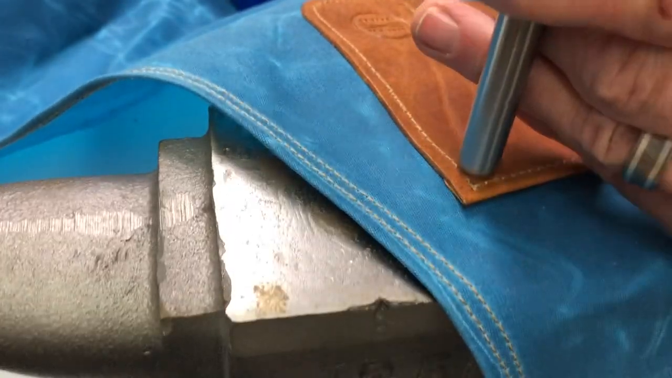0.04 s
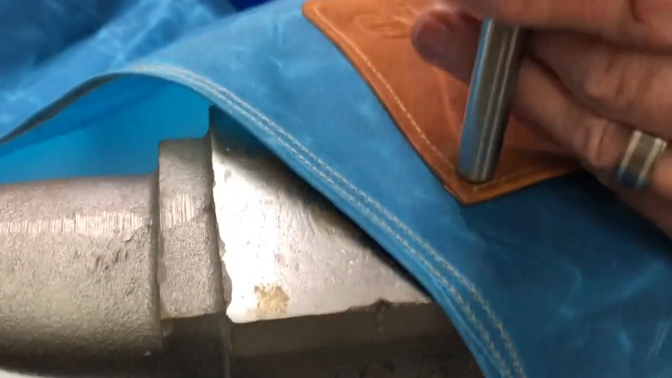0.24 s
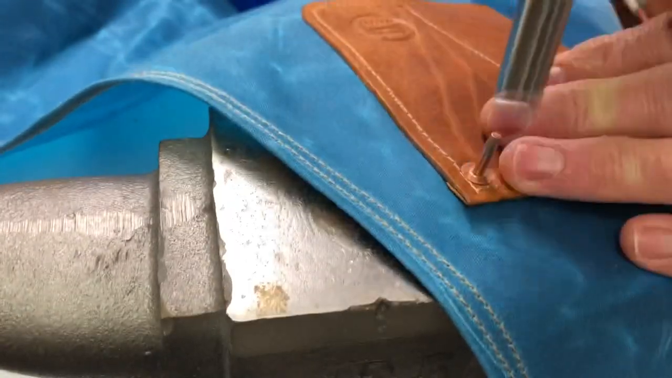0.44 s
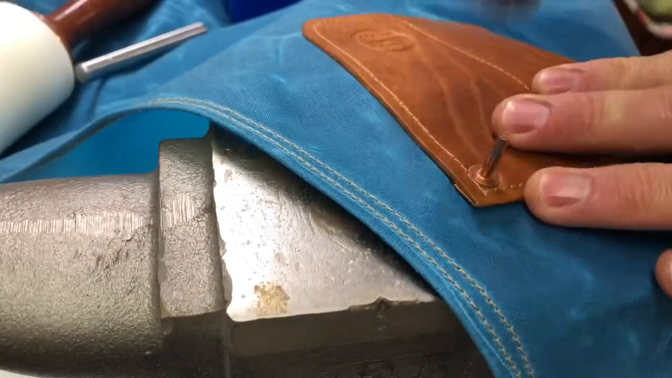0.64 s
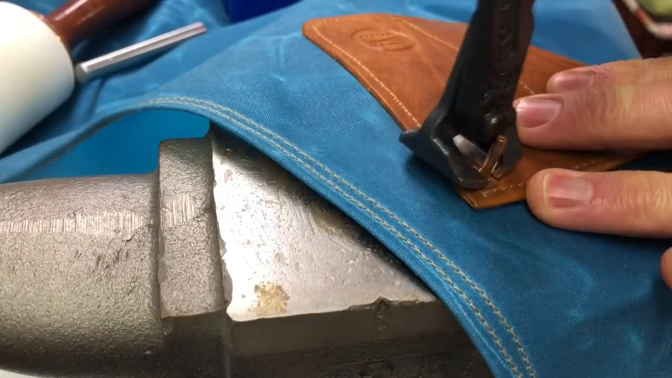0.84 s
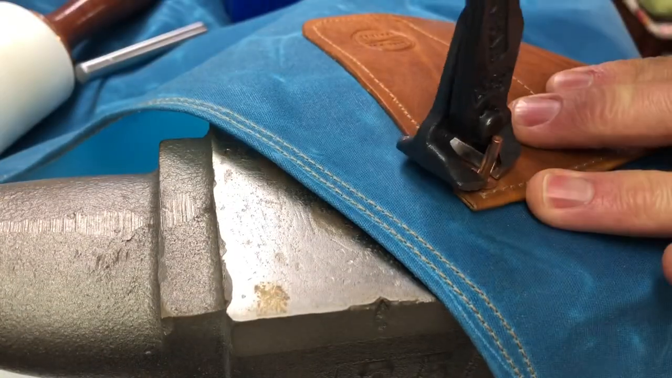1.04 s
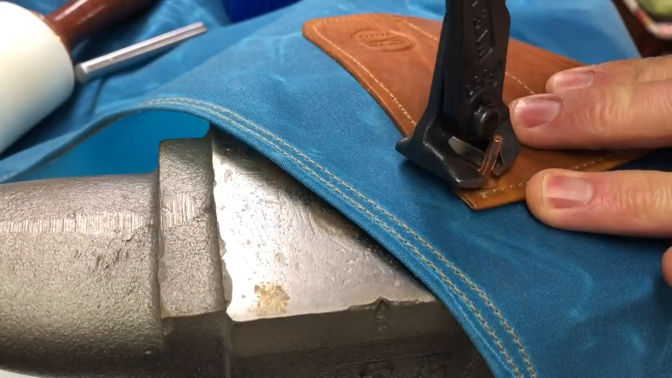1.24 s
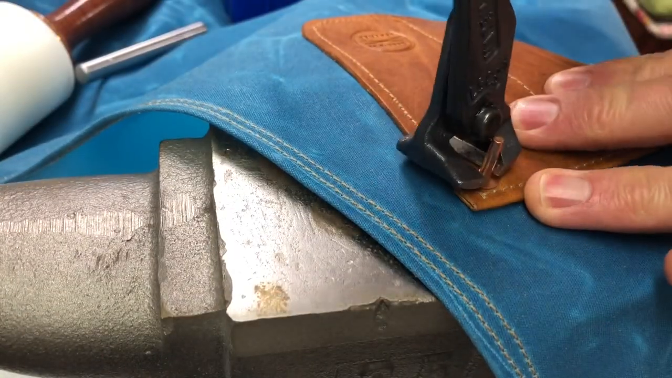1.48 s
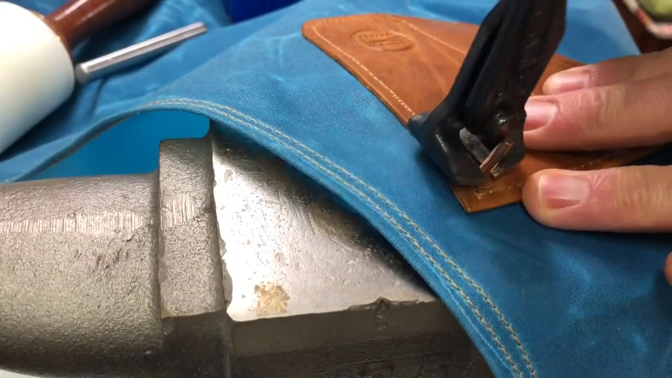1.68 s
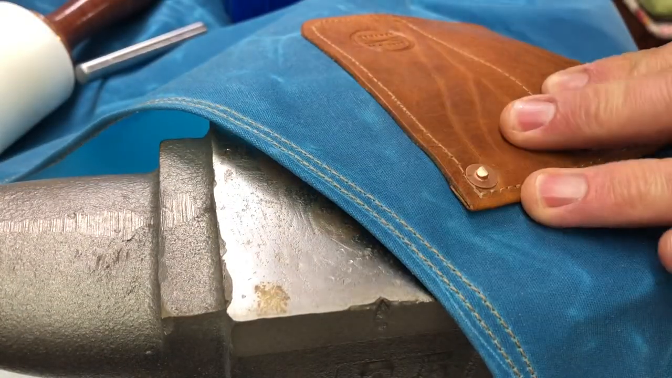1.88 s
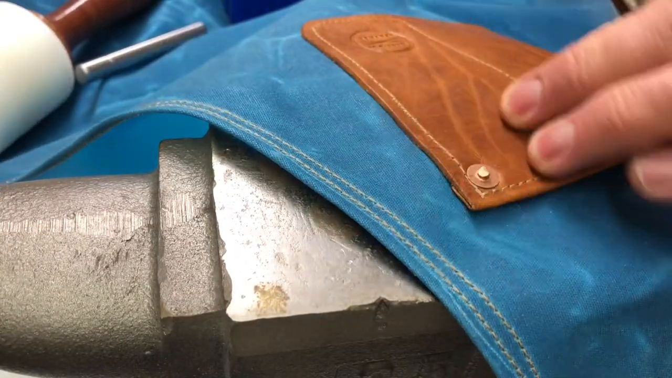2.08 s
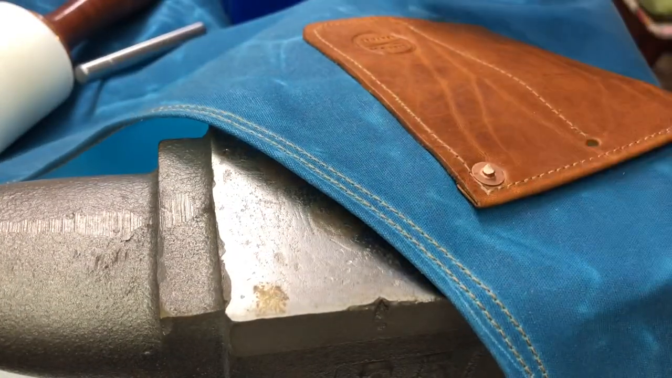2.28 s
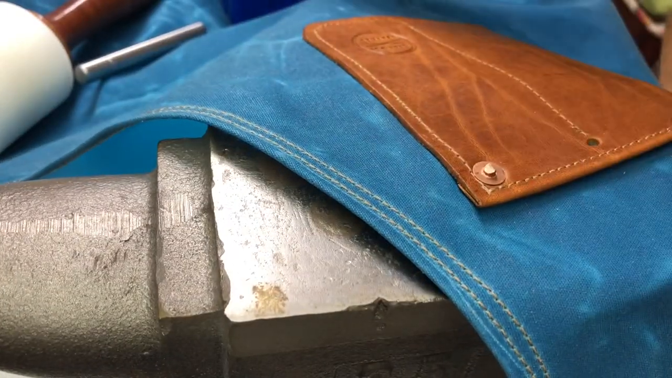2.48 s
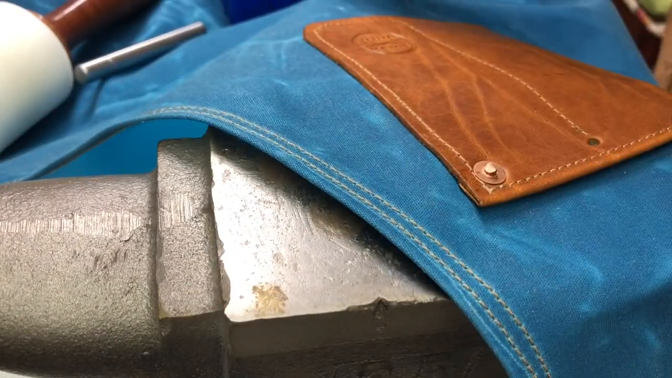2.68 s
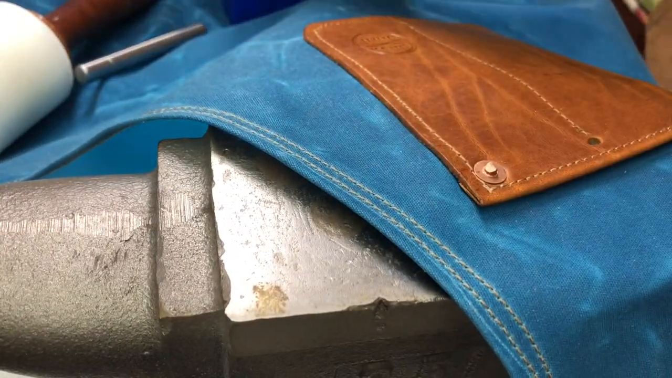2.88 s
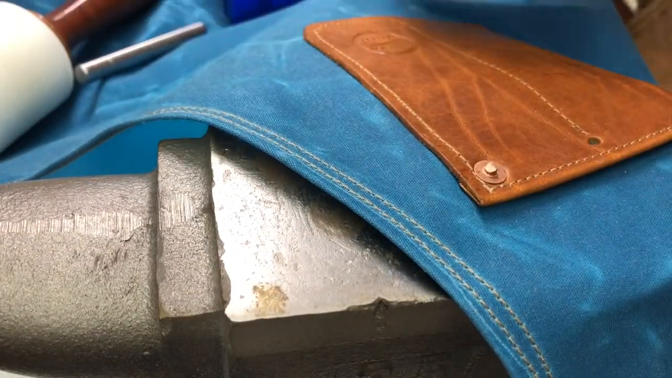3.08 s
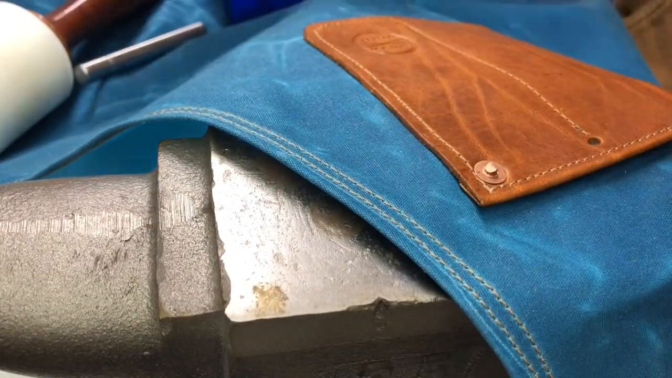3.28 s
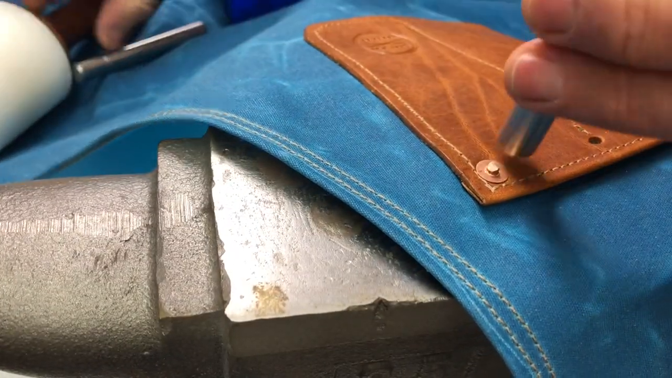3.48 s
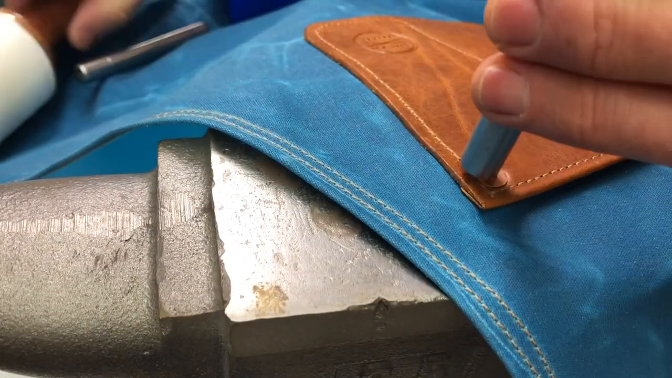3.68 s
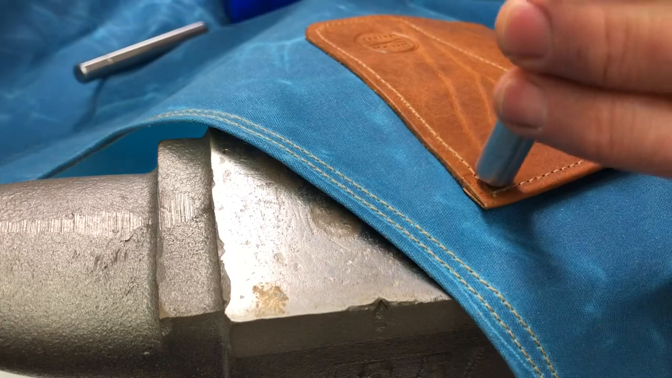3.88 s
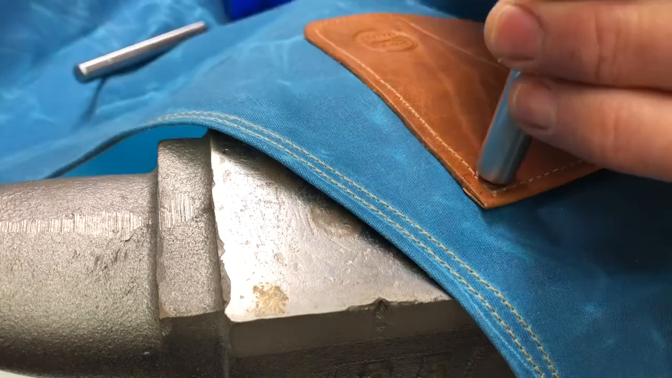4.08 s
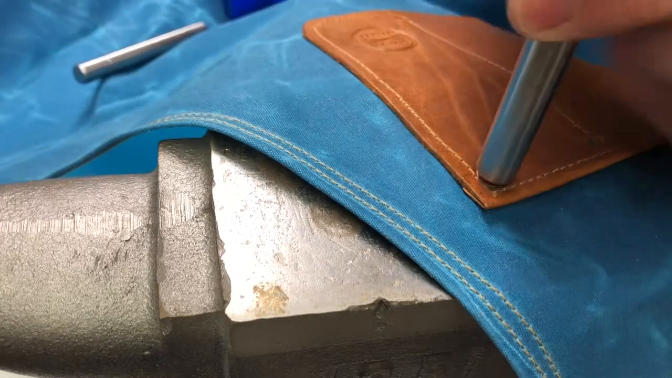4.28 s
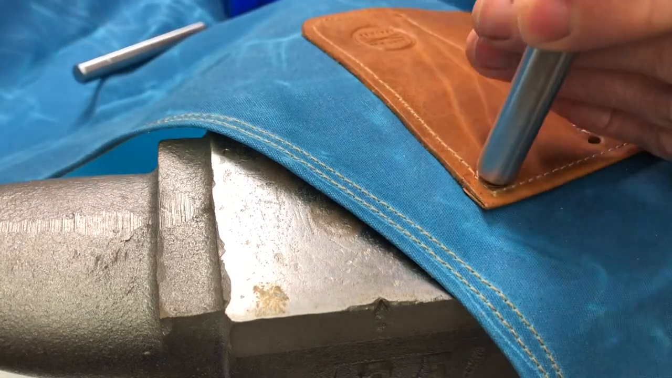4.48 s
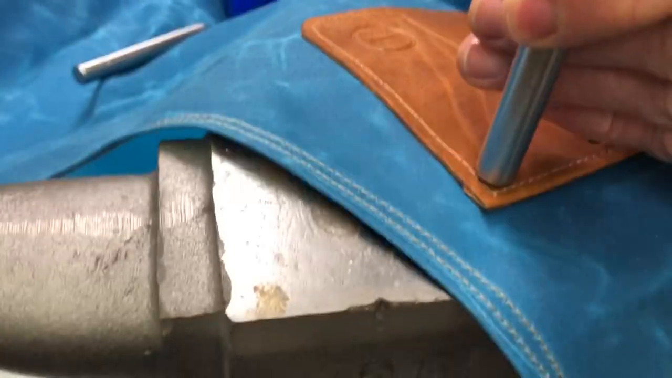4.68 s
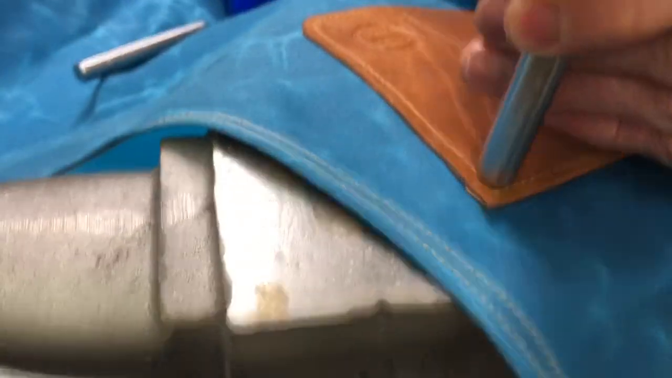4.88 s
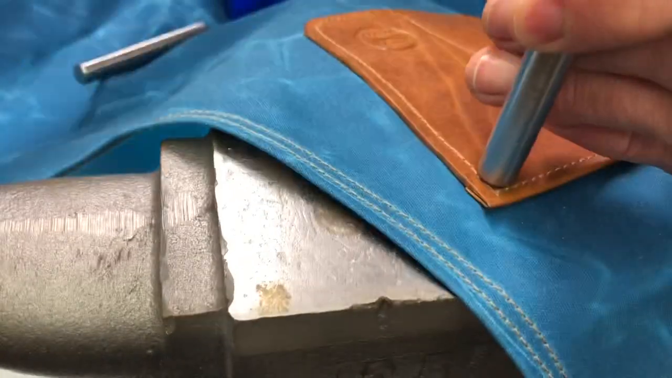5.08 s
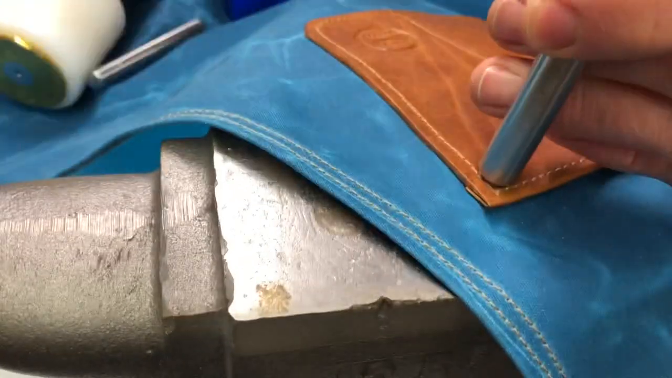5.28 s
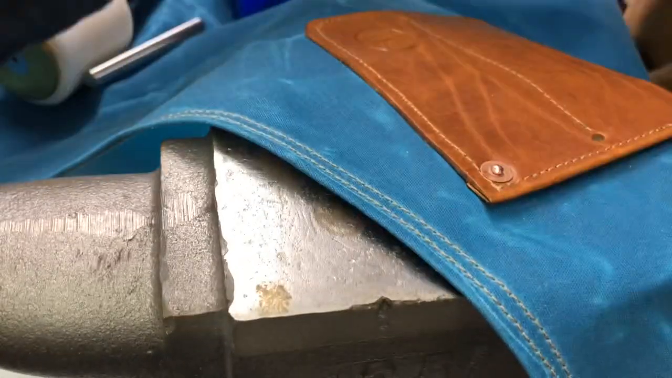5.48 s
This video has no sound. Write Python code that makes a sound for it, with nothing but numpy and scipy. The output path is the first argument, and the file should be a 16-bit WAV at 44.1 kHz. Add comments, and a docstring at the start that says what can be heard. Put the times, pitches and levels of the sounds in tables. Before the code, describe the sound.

Close workbench riveting: one metallic blow, light ticks and rustles, a dry snip, a leather scrape, then rapid mallet strikes ending in dull thuds.

```python
"""A workbench in fast motion: a mallet drives a steel setter on an anvil, tools tick, snip and are set down,
leather slides over canvas, fingers brush cloth, a motor hums far off. Noise bursts drive decaying modes for
each contact, filtered noise makes the rubs and air, wavering sines the motor. The speed-up keeps the pitch
but smears each blow into a burst that swells and fades; one edit dips to silence."""
import sys
import numpy as np
from scipy import signal
from scipy.fft import rfft, irfft
from scipy.io import wavfile
from scipy.ndimage import uniform_filter1d

SR = 44100
rng = np.random.default_rng(int(sys.argv[2]) if len(sys.argv) > 2 else 0)


def linear_from_db(decibels):
    """Turn decibels (scalar or array-like) into linear amplitude factors; 0 gives 1."""
    return 10 ** (np.asarray(decibels, float) / 20)


def unload_wav(signal):
    """Save mono or channel-first audio to the path in sys.argv[1] as 16-bit WAV at rate SR, clipped to [-1, 1]."""
    wavfile.write(
        sys.argv[1],
        SR,
        np.round(np.clip(np.atleast_2d(signal).T, -1, 1) * 32767).astype(np.int16),
    )


N = 244314
# time and frequency axes of one contact
SIZE = 32768
TIME, FREQ = np.arange(SIZE) / SR, np.fft.rfftfreq(SIZE, 1 / SR) + 1

# Spectrum of the room air. Each row: frequency in Hz, relative level in dB.
AIR_COLOUR = [(15, -46.5), (25, -12.5), (122, -4.5), (152, -9), (282, -5.5), (350, -10), (390, -10),
              (686, -14), (829, -12.5), (948, -13.5), (1350, -20), (1460, -18.5), (15600, -42)]
AIR_DB = -60.5
# Lines of the far motor. Each row: frequency in Hz, level in dB.
MOTOR_LINES = [(119, -82), (221, -74), (265, -72.5), (311, -69), (355, -67.5), (470, -77), (823, -77),
               (975, -83.5)]
# Decay of the room tail. Each row: band centre in Hz, t60 in seconds.
ROOM_DECAY = [(100, 0.19), (400, 0.27), (1500, 0.32), (5000, 0.14), (12000, 0.022)]
ROOM_DB = -19

# Light strokes of leather on canvas. Each row: start in seconds, hold in seconds, level in dB,
# hollow drag in dB re weave, sheen in dB re weave.
LEATHER_STROKES = [(.215, 0.073, -60, -6, -3.5), (0.354, 0.0067, -51, -4, -6), (.55, 0.17, -69.5, -1.5, -5),
                   (2.081, 0.074, -64, 6.5, -11.5), (2.242, 0.014, -52, 3, -15),
                   (2.293, 0.043, -68, 13.5, -7), (2.381, 0.045, -55, -1, -6.5),
                   (3.489, 0.037, -66.5, 10.5, -19.5), (3.609, 0.0087, -49, 0, -10.5),
                   (4.15, 0.1, -64, -2.5, -6), (5.35, 0.15, -59, 3, -8)]
STROKE_RISE_DB_PER_S, STROKE_FALL_DB_PER_S = 506.5, 303
# The long slide across the bench. Each row: time in seconds, level in dB, hollow drag in dB re weave.
LONG_SLIDE = [(2.47, -74, -2.5), (2.512, -47, 4), (2.556, -40.5, -7), (2.586, -41.5, -2),
              (2.606, -47, -1.5), (2.664, -38.5, 0.5), (2.704, -51, 2), (2.764, -75, -3), (2.8, -79, 0)]
# the sheen rises as the hollow drag falls
SLIDE_SHEEN_DB, SHEEN_PER_DRAG = -4, 0.4

# Fingers brushing cloth. Each row: time in seconds, smear in ms, level in dB.
CLOTH_BRUSHES = [(.231, 20, -53), (.305, 10, -47.5), (.535, 18, -60.5), (1.201, 7.3, -69),
                 (1.345, 17, -64.5), (1.391, 35, -65.5), (1.444, 19, -67)]
# Spectrum of the cutter on the rivet post. Each row: frequency in Hz, relative level in dB.
CUTTER_COLOUR = [(35, -55), (60, -13), (190, 0), (336, -13), (530, 0), (979, -17), (1100, -24), (1290, -13),
                 (1600, -17.5), (2320, -9), (3860, -19.5), (4870, -14), (5740, -21.5), (9140, -25),
                 (15600, -25)]
SNIP_S, SNIP_SMEAR_MS, SNIP_DB = 1.675, 4.5, -30
SNIP_TO_ROOM_DB = -12

# Tools ticking against the work. Each row: time in seconds, smear in ms, snap in dB, snap centre in Hz,
# thud in dB, fizz in dB.
TOOL_TICKS = [(.371, 4.2, -47, 3220, -51, -51), (.703, 8.8, -44.5, 3500, -62, -59.5),
              (.78, 7.5, -42, 3080, -51, -39), (.869, 5.3, -67, 3830, -65, -81),
              (2.431, 4.5, -48.5, 3660, -48, -73.5), (3.416, 8.1, -36, 4770, -50, -74),
              (3.544, 10.4, -47, 2660, -50.5, -67), (3.785, 20, -50, 2960, -55.5, -74)]
TICK_THUD_HZ = 454
# Tools and hands set down on the bench. Each row: time in seconds, smear in ms, thud in dB,
# thud centre in Hz, clatter in dB, fizz in dB.
SET_DOWNS = [(2.056, 5.6, -25.5, 276, -49, -48), (2.341, 12, -44, 346, -54.5, -77),
             (3.292, 55, -53, 190, -65, -66), (3.62, 13, -44.5, 197, -77, -58),
             (5.158, 30, -15, 348, -33, -34.5), (5.264, 20, -20, 310, -31.5, -26.5),
             (5.482, 27, -34.5, 550, -46.5, -64)]
CLATTER_HZ = 1530
# What a thump leaves ringing on the bench. Each row: frequency in Hz, relative level in dB, t60 in seconds.
CLUTTER_MODES = [(1085, 0, .1), (1184, -4, .05), (1317, -5, .04)]
CLUTTER_RE_CLATTER_DB = -4.5
# Setter rod ringing near 5.2 kHz, when handled or under a mallet blow. Each row: time in seconds,
# smear in ms, level in dB, tilt in dB per octave away from 5200 Hz, either way.
SETTER_ROD_RINGS = [(3.412, 1.9, -25.5, -1), (4.66, 43, -35.5, -13), (4.824, 8.9, -33, 1.5),
                    (5.127, 10.8, -44, -24)]
# Modes of the setter rod. Each row: frequency in Hz, relative level in dB, t60 in seconds.
SETTER_ROD_MODES = [(2013, -13, .05), (2090, -16, .025), (4560, -8, .045), (5080, -12, .025),
                    (5222, 0, .06), (8253, -30, .1), (10430, -16, .02), (13530, -9, .065)]
# The setter seated on the rivet. Each row: time in seconds, smear in ms, thud in dB, snap in dB, anvil in dB.
SETTER_SEATS = [(3.889, 10.6, -41, -43, -54), (4.083, 8.7, -33, -31, -39)]

# Mallet on setter. Each row: time in seconds, smear in ms, bench thud in dB, snap in dB,
# steel ring in dB, snap brightness in dB per octave.
MALLET_BLOWS = [(0.048, 16, -20.5, -25.5, -33.5, 4), (4.48, 7.3, -17.5, -22.5, -24, 1.5),
                (4.662, 23, -18.5, -28, -46.5, 0), (4.836, 14, -15.5, -25, -31, 0)]
# Spectrum of the mallet's snap. Each row: frequency in Hz, relative level in dB.
SNAP_COLOUR = [(290, -14), (500, 5.5), (603, -8), (915, -6.5), (2810, -13), (3540, -17.5), (5950, -16),
               (10300, -16), (12000, -25), (14500, -20), (15600, -21.5)]
# Modes of the bench. Each row: frequency in Hz, relative level in dB, t60 in seconds.
BENCH_MODES = [(75, -24, 0.037), (114.6, -6, 0.031), (209.8, 2, 0.091), (240.7, -1, 0.16),
               (276, -2.5, 0.06), (311, 1, 0.043), (362, -1, 0.026), (428, 10, 0.027), (484.7, 0.5, 0.04),
               (552.5, -24, 0.064), (670, -5, 0.038), (748, 2.5, 0.017), (844, -10, 0.041),
               (916, -13, 0.21), (1077, -19.5, 0.078), (1370, -20.5, 0.047), (1551, -13.5, 0.17)]
# The anvil sways on the bench after a blow. One row: frequency in Hz, relative level in dB, t60 in seconds.
ANVIL_SWAY = (158, -21, 1)
# High modes of the steel setter. Each row: frequency in Hz, relative level in dB, t60 in seconds.
SETTER_MODES = [(7150, -6, .02), (8870, -4, .012), (10300, -1, .012), (13200, -8, .012), (14290, 6, .025)]
# Modes of the anvil. Each row: frequency in Hz, relative level in dB, t60 in seconds.
ANVIL_MODES = [(1950, -6, .03), (2250, -8, .03), (3440, -5, .03), (3495, -3, .045), (3535, -4, .04),
               (3585, -4, .055), (3650, -7, .03), (3950, -11, .03), (4500, -14, .03)]
# The thicker setter of the blow before the edit. Each row: frequency in Hz, relative level in dB, t60 in seconds.
THICK_SETTER_MODES = [(1880, -3, .03), (2020, -3, .025), (2552, -6, .03), (2815, -7, .025),
                      (3731, -2, .035), (3957, -5, .03), (4430, -3, .035)]
THICK_SETTER_RE_SNAP_DB = -3.5
# the anvil rings with the snap, and more so when the setter sings
ANVIL_RE_SNAP_DB, ANVIL_SHARE_OF_RING = -2, 0.4
# a brighter snap goes with a duller thud
THUD_TILT_DB, THUD_FOLLOWS = 0.32, 0.96
BENCH_LAG_S = 0.012

# The skirt around each contact, full from 15 ms of smear, and the rattle's peak below the burst's.
SKIRT_HALF_MS, SKIRT_DB, RATTLE_DB = 59.8, -12.5, -2.75
# rattle t60 of each part
BENCH_RATTLE_S, STEEL_RATTLE_S, ANVIL_RATTLE_S, LIGHT_RATTLE_S = 0.18, 0.11, 0.23, 0.082

MIC_LOW_HZ = 44.7
# the level sinks to silence at the edit as a power of the time left, and returns
EDIT_S, FADE_OUT_S, FADE_IN_S, FADE_POWER = 0.507, 0.13, 0.036, 0.49


def colour(points, hz):
    """Gain of a spectrum given as points, joined on a log-frequency axis."""
    f, db = np.transpose(points)
    return linear_from_db(np.interp(np.log(hz), np.log(f), db))


def modes(table):
    """Frequency response of a set of decaying modes."""
    return sum(linear_from_db(db) / (np.log(1000) / t60 + 2j * np.pi * (FREQ - hz)) for hz, db, t60 in table)


def bell(f, hz, octaves):
    """Bell-shaped emphasis on a log-frequency axis."""
    return np.exp(-0.5 * (np.log2(f / hz) / octaves) ** 2)


def hump(hz, octaves):
    """The bell on a contact's frequency axis."""
    return bell(FREQ, hz, octaves)


def ripple(depth_db, width_hz):
    """The many small resonances of whatever is touched, new for each contact."""
    hz = np.arange(0, SR / 2 + width_hz, width_hz)
    return linear_from_db(depth_db * np.interp(FREQ, hz, rng.standard_normal(len(hz))))


def shaped(gain):
    """Unit noise with a given gain for each frequency."""
    even = N + N % 2
    spectrum = rfft(rng.standard_normal(even)) * gain(np.fft.rfftfreq(even, 1 / SR) + 1)
    x = irfft(spectrum)[:N]
    return x / x.std()


def walk(rate):
    """Slow chance with spread 1, taking about rate new values a second."""
    k = int(SR / rate)
    steps = np.repeat(rng.standard_normal(N // k + 1), k)
    x = uniform_filter1d(uniform_filter1d(steps, k), k)[:N]
    return x / x.std()


def add(out, s, smear_ms, parts):
    """One contact: a core in a speed-up skirt, then a dying rattle, drives each (response, dB, rattle t60 s)."""
    lead_s = 0.1  # room for the swell ahead of the contact
    t_ms = (TIME - lead_s) * 1000
    skirt = np.cos(np.clip(t_ms / SKIRT_HALF_MS, -1, 1) * np.pi / 2) ** 2
    core = np.exp(-np.abs(t_ms / smear_ms) ** 1.124)
    power = (skirt * (core + linear_from_db(SKIRT_DB) * min(smear_ms / 15, 1))) ** 2
    start = int((s - lead_s) * SR)
    a, b = max(start, 0), min(start + SIZE, N)
    for response, db, rattle_s in parts:
        keep = np.exp(-2 * np.log(1000) / (rattle_s * SR))
        rattle = signal.lfilter([1 - keep], [1, -keep], power)
        rattle = linear_from_db(2 * RATTLE_DB) * rattle * power.max() / rattle.max()
        drive = np.sqrt(power + rattle) * rng.standard_normal(SIZE)
        x = irfft(rfft(drive) * response)
        # the level is that of the loudest 16 ms
        loudest = uniform_filter1d(x ** 2, int(0.016 * SR)).max()
        out[a:b] += (linear_from_db(db) * x / np.sqrt(loudest))[a - start:b - start]


def background():
    """Room air as slowly swelling noise, and motor lines that waver in level and phase."""
    t = np.arange(N) / SR
    swell_db, waver_db, waver_rad = 0.6, 2.5, 1.2
    out = linear_from_db(AIR_DB + swell_db * walk(2.1)) * shaped(lambda f: colour(AIR_COLOUR, f))
    for hz, db in MOTOR_LINES:
        level = linear_from_db(db + waver_db * walk(10))
        out += np.sqrt(2) * level * np.sin(2 * np.pi * hz * t + waver_rad * walk(6))
    return out


def room(x):
    """Diffuse tail: noise bands that die each at their own rate."""
    tail = np.zeros(SIZE)
    for hz, t60 in ROOM_DECAY:
        band = irfft(rfft(rng.standard_normal(SIZE)) * hump(hz, 0.85))
        tail += band * np.exp(-np.log(1000) * TIME / t60)
    tail *= np.clip(TIME / 0.017, 0, 1)  # the tail builds up over 17 ms
    return signal.fftconvolve(x, linear_from_db(ROOM_DB) * tail / np.sqrt(np.sum(tail ** 2)))[:N]


def rubs():
    """Fibres catch in quick flutters; the dragged piece adds a hollow tone near 1.2 kHz."""
    t = np.arange(N) / SR
    catch = linear_from_db(1.1 * walk(70) + 1.2 * walk(400))
    weave = shaped(lambda f: bell(f, 3400, 0.81) * (1 + 1.2 / np.hypot(1, (f - 3100) / 300)))
    drag = shaped(lambda f: 1 / np.hypot(1, (f - 1230) / 130) + 0.33 / np.hypot(1, (f - 430) / 110))
    sheen = shaped(lambda f: bell(f, 10000, 1.0))
    # the long slide
    s, db, drag_db = np.transpose(LONG_SLIDE)
    edge = np.clip(np.minimum(t - s[0], s[-1] - t) / 0.03 + 0.5, 0, 1)
    hollow_db = np.interp(t, s, drag_db)
    hollow = linear_from_db(hollow_db + 1.4 * walk(29.6)) * drag
    shine = linear_from_db(SLIDE_SHEEN_DB - SHEEN_PER_DRAG * hollow_db) * sheen
    out = edge * linear_from_db(np.interp(t, s, db)) * (weave + hollow + shine)
    # the light strokes
    for s, hold, db, drag_db, sheen_db in LEATHER_STROKES:
        rise_db = -STROKE_RISE_DB_PER_S * np.maximum(s - t, 0)
        fall_db = -STROKE_FALL_DB_PER_S * np.maximum(t - s - hold, 0)
        out += linear_from_db(db + rise_db + fall_db) * (weave + linear_from_db(drag_db) * drag + linear_from_db(sheen_db) * sheen)
    return out * catch


def brushes():
    """Fingers on cloth: a soft burst of broad, treble-heavy noise."""
    out = np.zeros(N)
    for s, smear, db in CLOTH_BRUSHES:
        add(out, s, smear, [(hump(9700, 2.4) * ripple(3.2, 400), db, LIGHT_RATTLE_S)])
    return out


def cutter():
    """One dry snip close to the microphone: a short coloured burst."""
    out = np.zeros(N)
    snip = colour(CUTTER_COLOUR, FREQ) * ripple(2.5, 250)
    add(out, SNIP_S, SNIP_SMEAR_MS, [(snip, SNIP_DB, 0.012)])
    return out


def knock(thud_db, thud_hz, snap_db, snap_hz, fizz_db):
    """A light contact: part of the bench modes, a snap around one pitch and a broad fizz."""
    light = modes(BENCH_MODES) * np.exp(-2j * np.pi * FREQ * 0.00281)  # the bench answers 2.81 ms late
    thud = light * (hump(thud_hz, 1.0) + linear_from_db(-14) * hump(90, 0.7))
    touched = ripple(2.5, 400)
    snap = (hump(snap_hz, 0.36) + linear_from_db(-7) * hump(0.65 * snap_hz, 0.9)) * touched
    fizz = hump(5000, 2.7) * touched
    return [(thud, thud_db, 0.07), (snap, snap_db, LIGHT_RATTLE_S), (fizz, fizz_db, LIGHT_RATTLE_S)]


def ticks():
    """Tools against the work: light knocks, each snap at its own pitch."""
    out = np.zeros(N)
    for s, smear, snap_db, snap_hz, thud_db, fizz_db in TOOL_TICKS:
        add(out, s, smear, knock(thud_db, TICK_THUD_HZ, snap_db, snap_hz, fizz_db))
    return out


def thumps():
    """Tools and hands set down: knocks that leave clutter ringing on the bench."""
    out = np.zeros(N)
    for s, smear, thud_db, thud_hz, clatter_db, fizz_db in SET_DOWNS:
        clutter = (modes(CLUTTER_MODES), clatter_db + CLUTTER_RE_CLATTER_DB, 0.15)
        add(out, s, smear, knock(thud_db, thud_hz, clatter_db, CLATTER_HZ, fizz_db) + [clutter])
    return out


def setter_rod():
    """The setter rod rings near 5.2 kHz, handled or under a blow, its modes tilted away from 5200 Hz."""
    out = np.zeros(N)
    for s, smear, db, tilt_db in SETTER_ROD_RINGS:
        rod = modes(SETTER_ROD_MODES) * linear_from_db(tilt_db * np.abs(np.log2(FREQ / 5200)))
        add(out, s, smear, [(rod, db, 0.08)])
    return out


def seats():
    """The setter seated on the rivet: part of the bench modes, a small snap and the anvil."""
    out = np.zeros(N)
    for s, smear, thud_db, snap_db, anvil_db in SETTER_SEATS:
        thud = modes(BENCH_MODES) * (hump(560, 0.74) + linear_from_db(0.5) * hump(124, 0.83))
        snap = hump(2000, 0.96) * ripple(3.4, 305)
        add(out, s, smear, [(thud, thud_db, 0.08), (snap, snap_db, 0.05), (modes(ANVIL_MODES), anvil_db, 0.05)])
    return out


def blows():
    """Mallet blows snap, and ring bench, anvil and setter; the bench answers late."""
    out = np.zeros(N)
    bench = modes(BENCH_MODES + [ANVIL_SWAY]) * np.exp(-2j * np.pi * FREQ * BENCH_LAG_S)
    for s, smear, thud_db, snap_db, ring_db, bright_db in MALLET_BLOWS:
        thud_tilt_db = THUD_TILT_DB - THUD_FOLLOWS * bright_db
        thud = bench * linear_from_db(thud_tilt_db * np.log2(np.clip(FREQ, 60, 2000) / 250))
        snap = colour(SNAP_COLOUR, FREQ) * ripple(0.54, 200)
        snap = snap * linear_from_db(bright_db * np.log2(np.clip(FREQ, 500, 4000) / 2000))
        anvil_db = snap_db + ANVIL_RE_SNAP_DB + ANVIL_SHARE_OF_RING * (ring_db - snap_db)
        parts = [(thud, thud_db, BENCH_RATTLE_S), (snap, snap_db, 0.1),
                 (modes(SETTER_MODES), ring_db, STEEL_RATTLE_S), (modes(ANVIL_MODES), anvil_db, ANVIL_RATTLE_S)]
        if s < EDIT_S:
            parts.append((modes(THICK_SETTER_MODES), snap_db + THICK_SETTER_RE_SNAP_DB, 0.18))
        add(out, s, smear, parts)
    return out


def scene():
    """Near sounds with their tail, over the background."""
    near = rubs() + brushes() + ticks() + thumps() + setter_rod() + seats() + blows()
    snip = cutter()
    tail = room(near + linear_from_db(SNIP_TO_ROOM_DB) * snip)
    return (near + snip + tail + background())[None]


def top_cut(x):
    """Nothing passes above the cut-off."""
    return signal.sosfilt(signal.butter(12, 15750, fs=SR, output="sos"), x)


def record(dry):
    """The microphone drops the deepest bass; the sound fades in, then out and in again at the edit."""
    t = np.arange(N) / SR
    before = np.minimum((EDIT_S - t) / FADE_OUT_S, (t + 0.0044) / FADE_IN_S)
    after = (t - EDIT_S) / FADE_IN_S
    fade = np.clip(np.where(t < EDIT_S, before, after), 0, 1) ** FADE_POWER
    heard = signal.sosfilt(signal.butter(3, MIC_LOW_HZ, "high", fs=SR, output="sos"), dry)
    return top_cut(heard * fade)


dry = scene()
out = record(dry)
unload_wav(out)
```